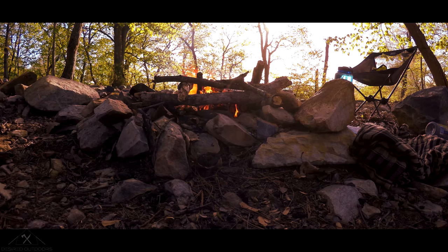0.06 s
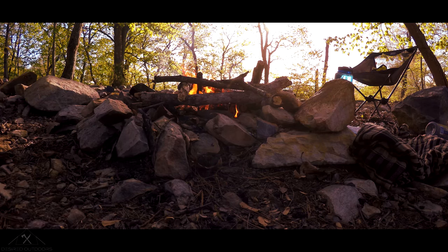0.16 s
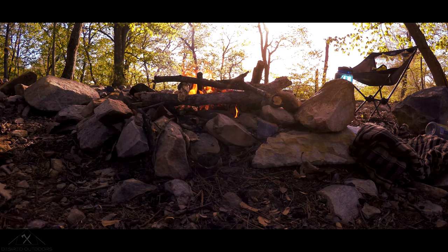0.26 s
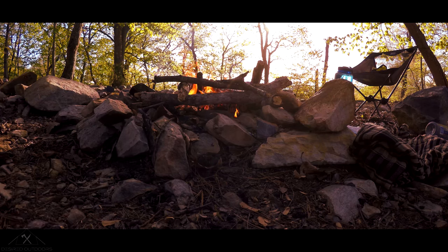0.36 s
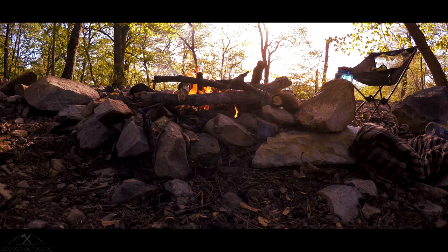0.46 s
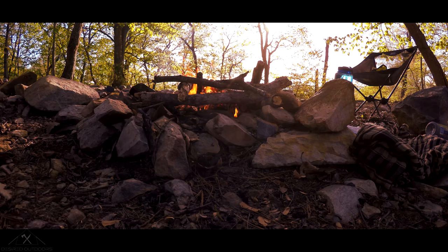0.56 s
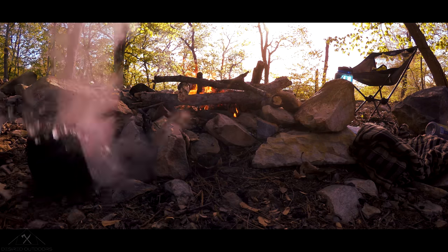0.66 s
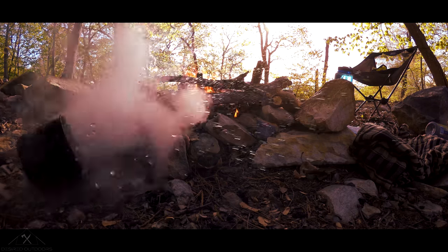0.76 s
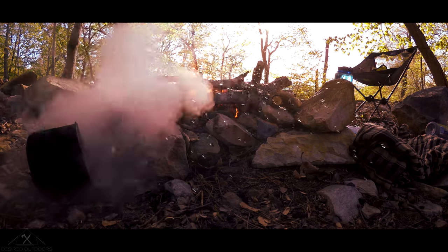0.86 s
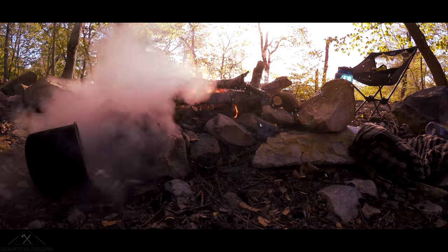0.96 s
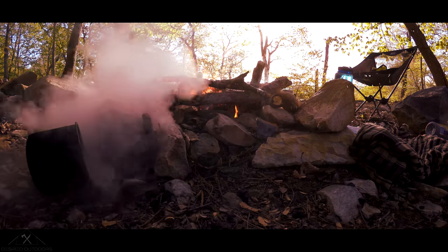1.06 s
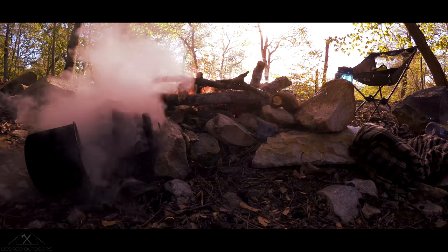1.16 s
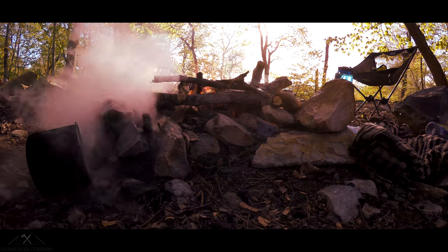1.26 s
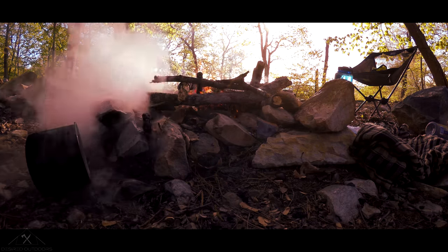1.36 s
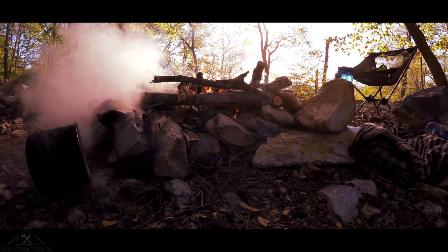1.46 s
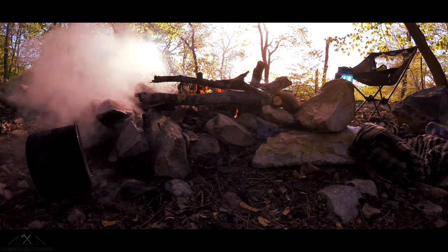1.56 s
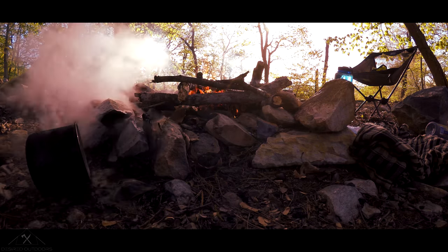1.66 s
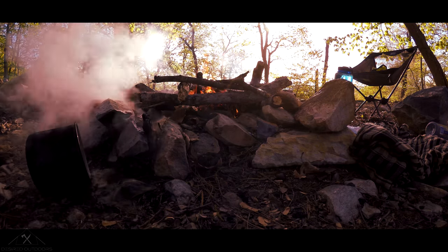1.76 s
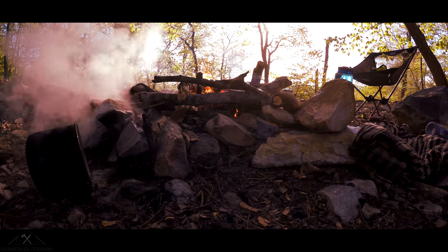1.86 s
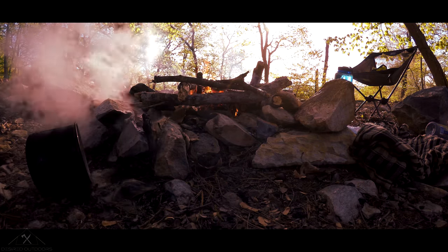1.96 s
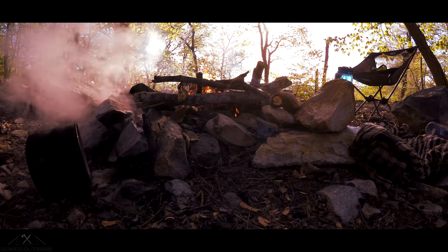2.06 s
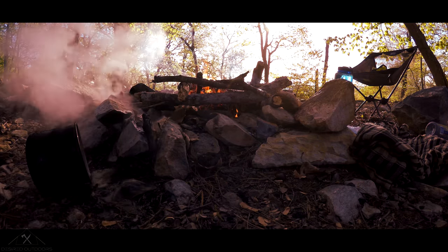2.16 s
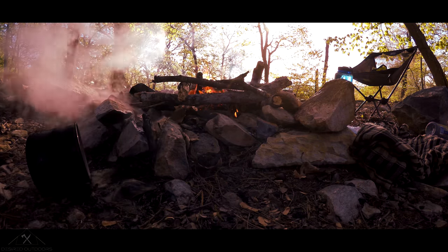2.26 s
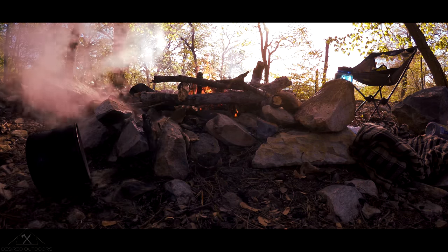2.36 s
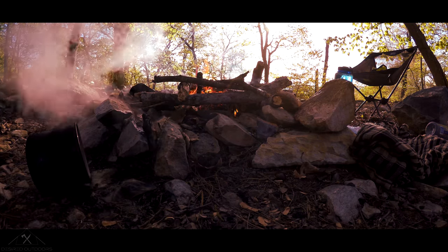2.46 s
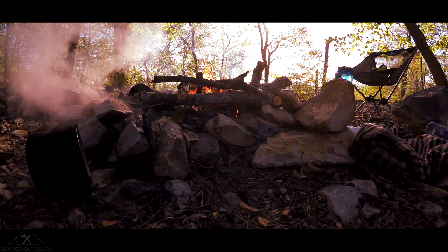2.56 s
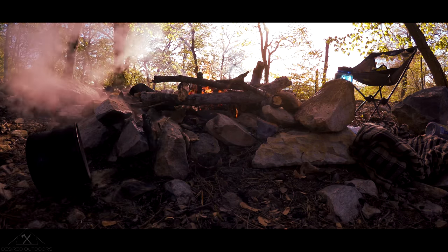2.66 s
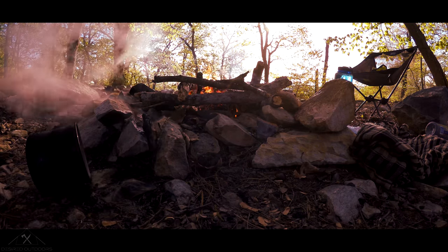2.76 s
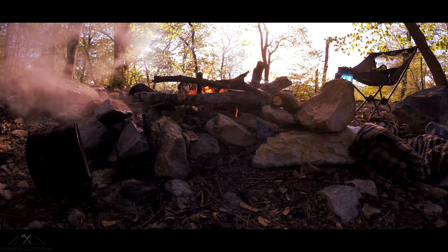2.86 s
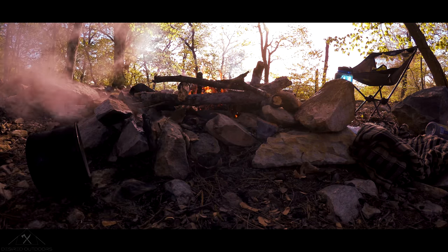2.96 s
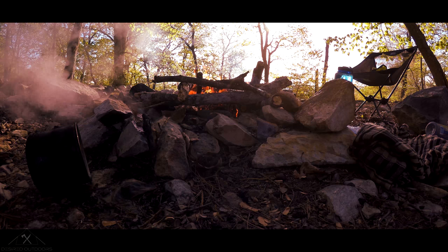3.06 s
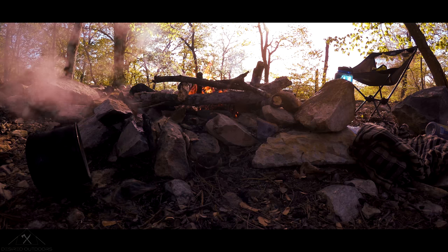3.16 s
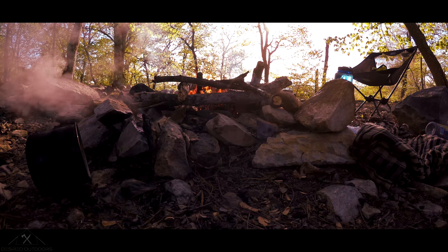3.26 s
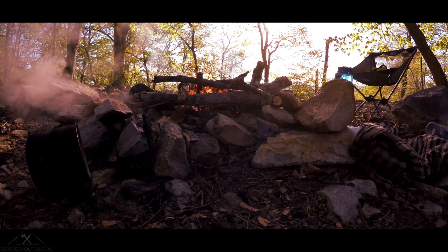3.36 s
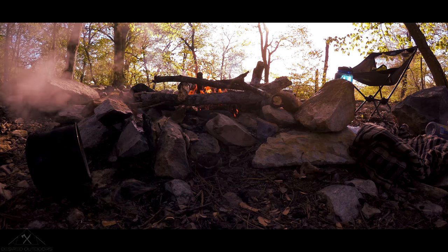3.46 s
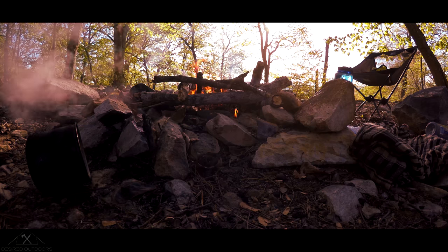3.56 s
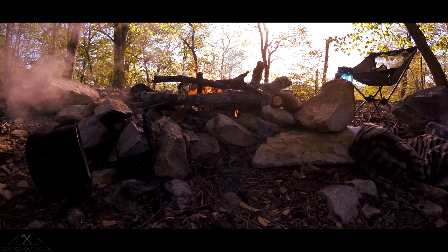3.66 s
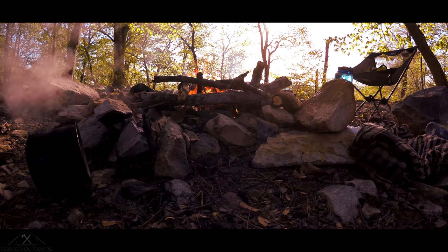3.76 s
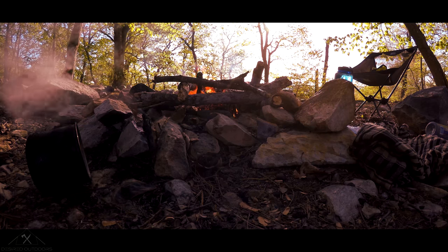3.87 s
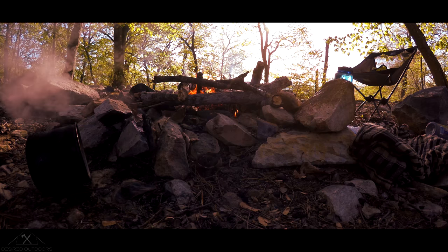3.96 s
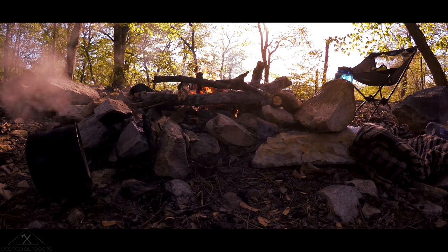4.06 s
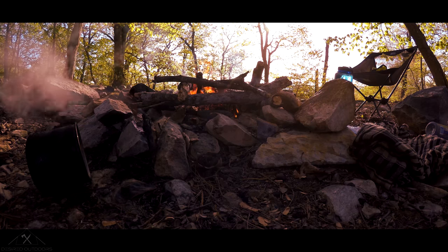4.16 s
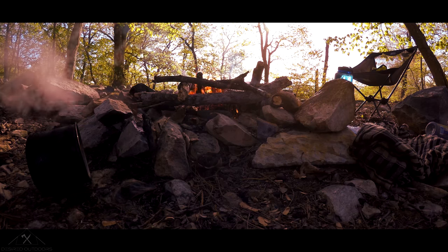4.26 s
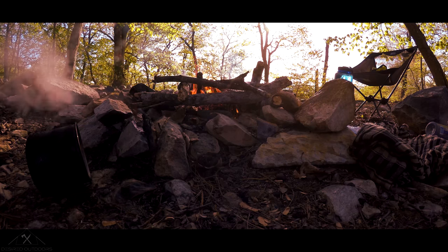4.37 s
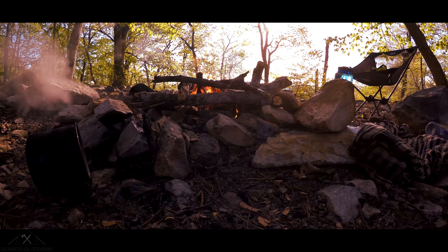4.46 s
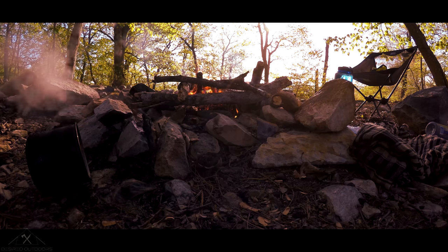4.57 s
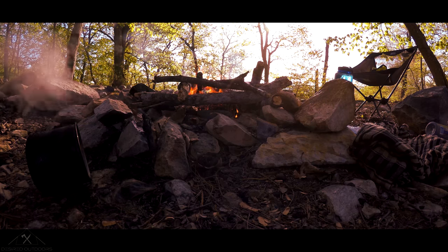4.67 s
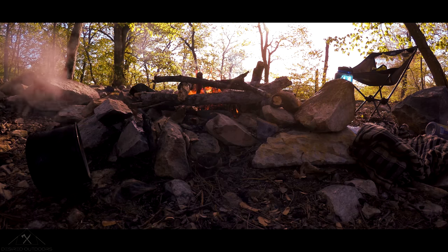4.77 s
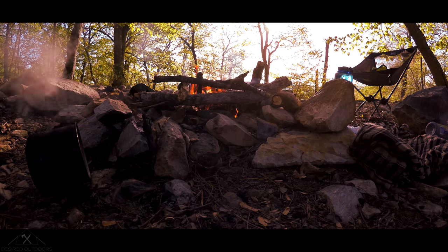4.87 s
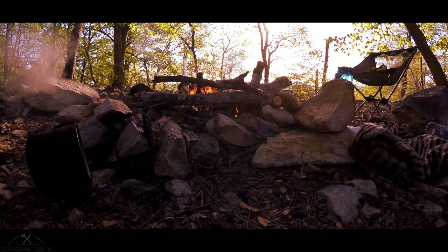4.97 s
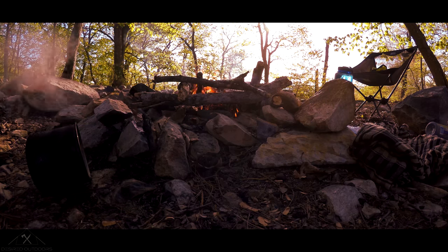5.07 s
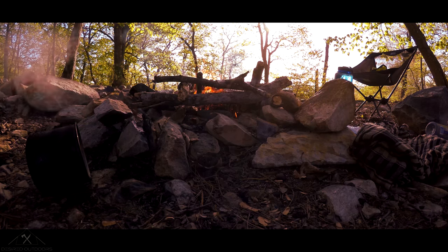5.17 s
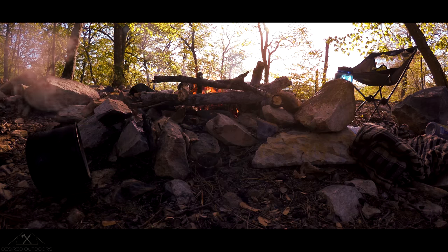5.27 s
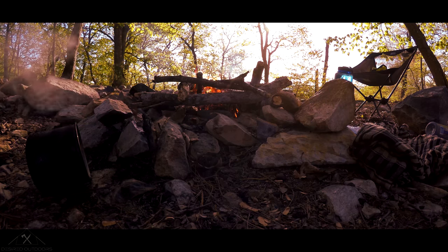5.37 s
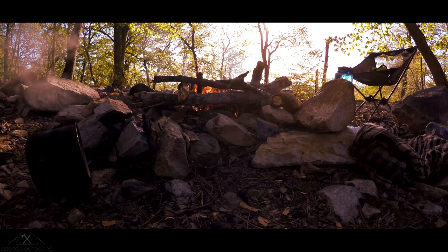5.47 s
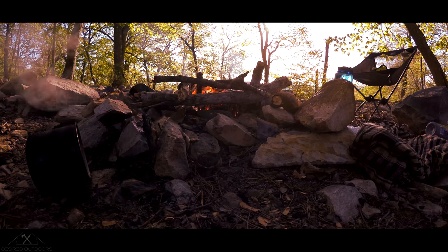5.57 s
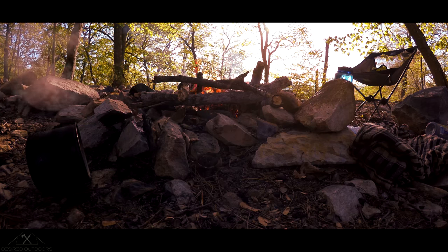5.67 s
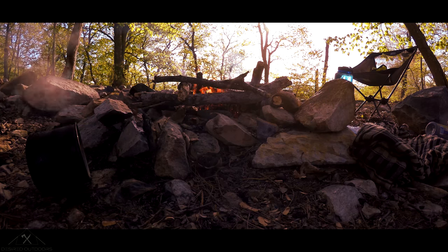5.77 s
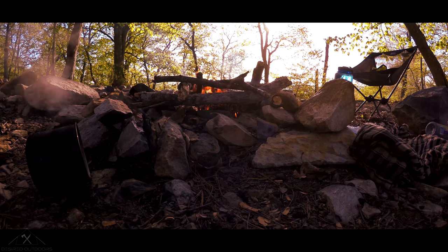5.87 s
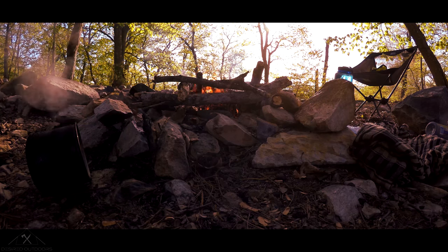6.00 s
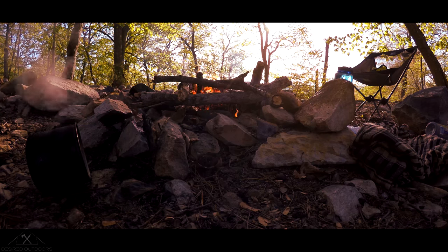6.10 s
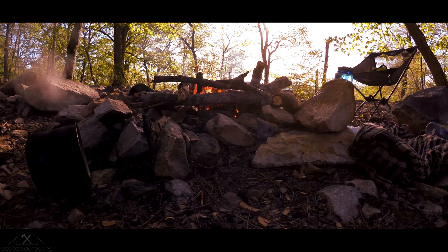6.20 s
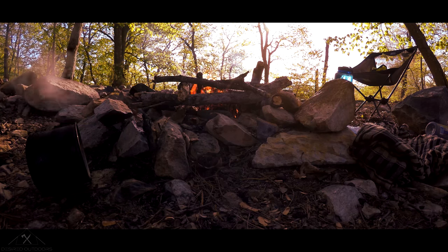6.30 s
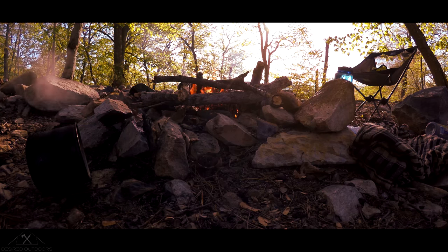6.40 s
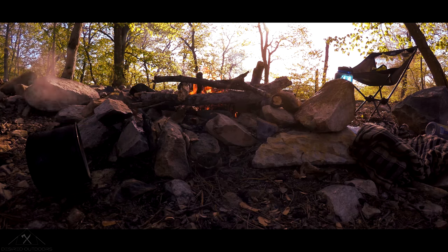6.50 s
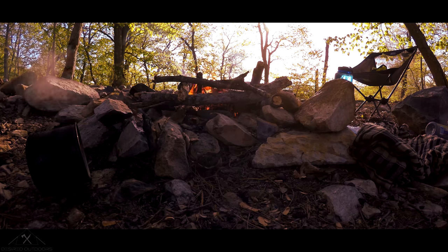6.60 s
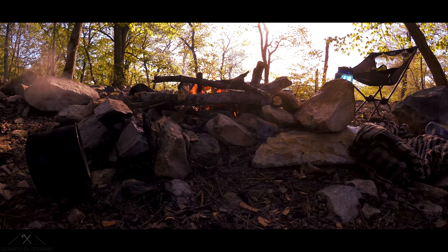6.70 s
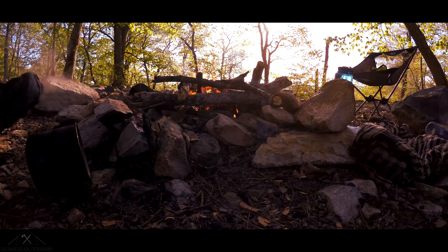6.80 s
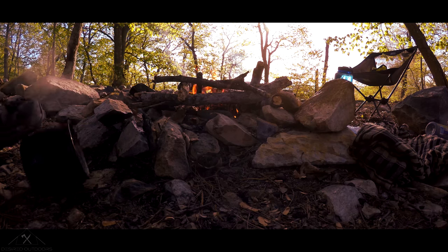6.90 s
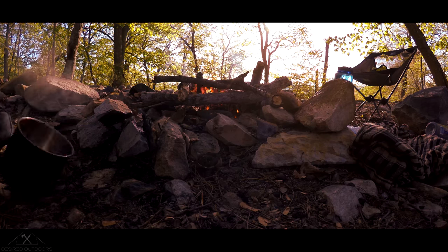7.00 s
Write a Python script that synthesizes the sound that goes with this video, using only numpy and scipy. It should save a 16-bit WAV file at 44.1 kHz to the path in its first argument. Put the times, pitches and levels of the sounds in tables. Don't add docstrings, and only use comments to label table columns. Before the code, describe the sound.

Water gurgles from a pot and bursts into hissing steam on hot campfire stones, the pot bangs down hard, then rocks on grit amid snaps.

```python
import sys
import numpy as np
from scipy import signal
from scipy.fft import rfft, irfft
from scipy.io import wavfile

SR = 44100
rng = np.random.default_rng(int(sys.argv[2]) if len(sys.argv) > 2 else 0)


def magnitude_from_level(level_db):
    exponent = np.asarray(level_db, float) / 20
    return 10 ** exponent


def output_pcm(signal):
    pcm = np.clip(np.atleast_2d(signal).T, -1, 1) * 32767
    wavfile.write(sys.argv[1], SR, np.round(pcm).astype(np.int16))


N = 310464
TIME = np.arange(N) / SR

# time in seconds, level in dB.
STEAM_PHASES = [
    [(0.0, -63), (0.136, -64.5), (0.2, -58.5), (0.32, -52.5)],
    [(0.33, -48), (0.442, -33.5), (0.474, -33.5), (0.504, -36), (0.6, -34.5), (0.684, -33), (0.7, -38)],
    [(0.73, -31.5), (0.76, -36), (0.854, -41.5), (0.884, -43.5), (0.905, -42.5)],
    [(0.915, -52), (0.97, -42), (0.994, -42.5), (1.118, -40), (1.216, -38.5), (1.25, -43), (1.395, -49)],
]
# slosh in the hollow, spatter, top sizzle, all in dB re steam.
STEAM_COMPANIONS = [
    (-2, -8.5, -11),
    (-5.5, -9.5, -8.5),
    (-1.5, -17.5, -3),
    (-4, -7.5, -4),
]
# frequency in Hz, density in dB per Hz.
STEAM_SPECTRUM = [(1350, -34), (2300, -7), (2870, 0), (3200, -4), (3840, -2.5), (4690, -4), (5930, -2),
                  (9000, -11), (11700, -36.5), (19800, -120)]
# frequency in Hz, density in dB per Hz.
SIZZLE_SPECTRUM = [(4710, -30), (8000, -7.5), (8660, -4), (12800, -5), (15400, -9)]
# time in seconds, level in dB.
RIM_GURGLE = [(0.0, -84), (0.068, -56.5), (0.134, -75), (0.192, -57.5), (0.312, -54.5), (0.42, -61)]
# frequency in Hz, width in Hz, level in dB re steam.
TRICKLE_RESONANCES = [(2800, 300, -10), (5800, 450, -8), (7500, 800, -9)]
GUSH_WASH_DB = -14.5
# centre in seconds, length in seconds, pitch in Hz, level in dB.
STEAM_JETS = [(.845, 0.034, 3200, -40.5), (.828, .015, 6500, -40), (0.63, 0.017, 7500, -38),
              (.815, .012, 8000, -44), (.945, 0.015, 9000, -49), (0.82, 0.032, 9700, -39),
              (1.2, .03, 4050, -45), (1.1, .02, 3400, -45), (0.98, 0.033, 2000, -40.5),
              (0.9, .03, 3000, -43), (.471, .012, 13000, -32.5), (.471, .012, 5700, -30),
              (0.38, .01, 9300, -41), (.6, .03, 3900, -38.5), (.665, .04, 5800, -36.5),
              (1.591, .011, 7500, -37), (1.576, 0.0091, 5900, -43), (1.42, 0.023, 6900, -41),
              (2.068, 0.028, 8400, -42.5), (2.066, 0.022, 4800, -49), (1.48, 0.052, 2800, -46),
              (2.345, 0.016, 6000, -41), (2.617, 0.011, 5700, -58.5), (2.44, 0.037, 4250, -45),
              (3.73, .05, 4100, -60)]
JET_EDGE_RATIO = 1.09

HOLLOW_HZ, HOLLOW_WIDTH_HZ = 740, 540

CONTACT_S = [
    .7110,
    .7162,
    .7192,
    .7408,
]
# crack in dB, crack t60 in seconds, hollow ring in dB, thud in dB.
CONTACTS = [
    (-6, 0.018, -15.5, -20.5),
    (-4, 0.012, 1, -9.5),
    (-13.5, 0.037, -17.5, -20),
    (-16.5, .005, -32.5, -37.5),
]
# frequency in Hz, level in dB, t60 in seconds.
BODY_MODES = [(263.7, 1.5, 0.014), (437, -6.5, 0.021), (516, -11.5, 0.042), (657, -9.5, 0.05),
              (766, -7, 0.034), (799, -12.5, 0.1), (924, -5, 0.028), (2000, -2, 0.014), (2500, 1.5, 0.0085)]
# frequency in Hz, level in dB, t60 in seconds.
THIN_WALL_MODES = [(4750, -22.5, .03), (5044, -22.5, 0.029), (5820, -22, .04), (6300, -21.5, 0.032),
                   (6695, -22.5, 0.039), (8800, -24, 0.018), (9300, -25, .05), (12200, -24, 0.017)]
# frequency in Hz, density in dB per Hz.
CRACK_SPECTRUM = [(710, -47), (1200, -20.5), (1650, -13.5), (2330, -7.5), (3300, -14), (4860, -1),
                  (6480, -3), (15400, -12)]

# start in seconds, contact in seconds, grind in dB, sag in the middle in dB.
ROCKING_SWINGS = [
    (1.381, 0.22, -34, 3.5),
    (1.818, .255, -38, 2.0),
    (2.255, .265, -44, -3),
    (2.704, 0.23, -46.5, -3),
    (3.155, 0.2, -47.5, -1),
    (3.618, .17, -53.5, -5),
    (6.932, 0.17, -52, 3),
]
FIRST_SWING_S = ROCKING_SWINGS[0][0]
LIFT_S = 6.9
SWELL_DB_PER_S, RISE_DB_PER_S, FALL_DB_PER_S = 8.5, 701, 127
FALL_STEEPENS_PER_S = 0.97
HOLLOW_DB, SPATTER_DB, DRYING_DB_PER_S = -10, -15, 5
SEETHE_DB, SEETHE_FALL_DB_PER_S = -49, 9
# frequency in Hz, width in Hz, level in dB.
WALL_RESONANCES = [(2480, 88, -11.5), (2930, 61, -19), (3850, 100, -18), (4210, 90, -14), (5690, 200, -9.5),
                   (6430, 400, -6.5), (7030, 110, -10), (7660, 320, -4), (8780, 350, -2), (9400, 410, -6.5),
                   (10660, 330, -18), (11870, 370, -12), (13100, 400, -10)]
# time in seconds, level in dB.
WALL_CLARITY = [(1.4, -11), (2.2, -3), (2.8, 2), (7.04, 6)]
# frequency in Hz, density in dB per Hz.
GRIND_SPECTRUM = [(1000, -4), (1300, 2), (2100, -16), (2480, 0.5), (4990, 0.5), (6460, -2.5),
                  (12800, -10.5), (15400, -11.5)]
# frequency in Hz, density in dB per Hz.
SEETHE_SPECTRUM = [(900, -9), (1800, -2.5), (4000, -1), (9000, -1), (15400, -8.5)]

# time in seconds, peak in dB, pitch in Hz, t60 in seconds.
STONE_KNOCKS = [(.546, -18, 686, 0.0078), (.581, -18.5, 700, 0.0077), (.615, -24.5, 855, 0.015),
                (.643, -31.5, 1010, 0.022), (.663, -28, 1060, 0.024), (.915, -40.5, 750, 0.023),
                (.96, -37, 800, 0.033), (1.15, -40, 300, 0.087), (1.191, -40, 180, .09),
                (1.618, -36, 800, .01), (1.891, -39, 750, .008), (2.034, -39, 790, .012),
                (2.487, -34, 804, 0.011), (2.865, -41, 800, .01), (3.331, -43, 750, .014),
                (3.543, -51.5, 520, .015), (3.852, -51, 1494, 0.009), (3.918, -48.5, 1037, 0.011),
                (5.187, -54, 1202, 0.022), (5.96, -47, 1800, 0.012), (6.208, -47, 1290, 0.016),
                (6.2312, -46.5, 710, 0.026), (6.236, -53, 1107, 0.02), (6.241, -55, 1000, 0.023),
                (6.245, -52.5, 1110, 0.016), (6.29, -54.5, 890, 0.017), (6.331, -45, 550, 0.025),
                (6.53, -50, 1010, 0.013), (6.261, -51, 700, 0.02), (6.7349, -26.5, 815, 0.034),
                (6.7349, -22.5, 1230, 0.017), (6.941, -41, 880, 0.1), (6.944, -34.5, 210, 0.068),
                (6.999, -47.5, 946, 0.095), (6.891, -49.5, 1400, 0.012), (.462, -28, 870, 0.096)]
# time in seconds, level in dB.
WIRE_TAPS = [(6.9415, -46), (6.951, -48), (6.9575, -47), (6.976, -50), (6.988, -48), (7.006, -49),
             (7.018, -50), (7.03, -52)]
# frequency in Hz, level in dB, t60 in seconds.
WIRE_MODES = [(2590, -4, .06), (3730, -6, .05), (4420, -1, .06), (5500, -3, .05), (5730, -2, .05),
              (6750, 0, .06), (7200, 0, .05), (8160, 0, .07), (9100, -2, .04), (9990, 0, .06),
              (10250, -2, .05), (11500, -3, .04)]

# time in seconds, peak in dB, pitch in Hz, broad part in dB re peak.
DROP_BURSTS = [(0.0335, -50, 13000, -15), (0.0508, -41, 12400, -5.5), (0.145, -56, 12000, -3),
               (0.3386, -33, 5550, -6), (0.399, -25, 3340, -6.5), (0.4264, -22, 5750, -13),
               (0.4674, -19, 13100, -1.5), (0.4725, -21, 9000, -1), (0.8256, -26, 6400, -4.5),
               (0.8635, -30, 6500, -5.5), (0.9384, -38, 3100, -6), (1.0531, -28, 4000, -5.5),
               (0.4894, -28, 5940, -2), (0.9035, -17, 4070, -10), (0.9848, -27, 2300, 0),
               (0.9853, -26.5, 7200, -7.5), (1.2183, -24, 5200, -4), (1.4125, -21.5, 4330, -4),
               (1.4222, -18.5, 4400, -4), (1.4416, -23.5, 2500, -4), (1.5719, -25, 5950, -5),
               (1.5889, -26, 7480, -5), (1.605, -39, 5500, -9), (1.6125, -21, 1990, -6),
               (1.618, -25, 5000, -3), (1.626, -26, 10500, -2.5), (1.6345, -27, 9400, 4),
               (1.643, -29, 6500, -3), (1.7087, -31.5, 5870, -1.5), (1.72, -32, 8500, -3),
               (1.745, -34, 6000, -4), (1.789, -32, 4770, -1), (1.8714, -22.5, 4870, -3.5),
               (1.8922, -22, 4340, -2), (1.909, -28, 4500, -6), (1.918, -33, 1900, -3),
               (2.033, -25, 4300, -3), (2.053, -30, 5500, -4), (2.063, -29, 2500, -4.5)]
# time in seconds, peak in dB, pitch in Hz, broad part in dB re peak.
GRIT_SNAPS = [(2.282, -38.5, 7800, -9), (2.332, -35, 11000, -5), (2.345, -31, 6310, -1),
              (2.395, -32, 4500, -4), (2.4423, -23.5, 4220, 0), (2.457, -30, 9000, 1),
              (2.47, -25, 2980, -8), (2.487, -26, 7550, 2), (2.6134, -39.5, 5680, -4),
              (2.719, -44, 5500, -10), (2.7296, -41, 7550, -5), (2.872, -31, 6720, -4),
              (2.916, -23, 7560, -7), (2.922, -33.5, 13000, -3), (3.0584, -37.5, 13100, -12),
              (3.1704, -39, 7580, -11), (3.3305, -27, 8200, -5), (3.5424, -44, 7930, 2),
              (3.6463, -45, 4190, -5.5), (3.851, -44, 8290, -1), (3.8785, -41.5, 13000, -3),
              (3.9007, -26.5, 8370, -8.5), (3.9182, -28, 12900, -4), (6.7089, -46, 4690, -7.5),
              (6.7349, -18.5, 2190, -8.5), (6.8064, -32.5, 6600, -8.5), (6.8835, -53, 2500, 0),
              (6.9428, -28.5, 6800, -2)]
# time in seconds, peak in dB, pitch in Hz.
EMBER_POPS = [(4.2734, -46.5, 6660), (4.6111, -46.5, 4542), (4.8601, -47, 8220), (5.0805, -46, 13100),
              (5.2033, -29.5, 12530), (5.224, -43, 10800), (5.2697, -42, 7900), (5.3006, -48, 8650),
              (5.4482, -39, 6790), (5.4743, -46, 3130), (5.571, -49, 3755), (5.6148, -53.5, 3690),
              (5.6472, -42, 8240), (5.8617, -43, 7540), (5.9586, -52, 2390), (6.0278, -39, 7850),
              (6.0757, -46, 3410), (6.207, -45, 2020), (6.2401, -43, 6680), (6.2577, -43.5, 7200),
              (6.3107, -46, 12780), (6.3518, -40.5, 8250), (6.434, -41.5, 4100), (6.496, -48, 7910),
              (6.5122, -42, 6300), (6.5762, -43.5, 4750), (6.6405, -44, 7360)]
DROP_LOW_DB, GRIT_LOW_DB, EMBER_LOW_DB, EMBER_BROAD_DB = -9.5, -11, -14.5, -4.5
LOW_DB_PER_OCTAVE = -5
# time in seconds, level in dB.
EMBER_CRACKLE = [(0, -65), (4.9, -64), (5.3, -59), (7.04, -58)]

# (time in seconds, level in dB).
BIRD_NOTES = [((.014, 5200, 5700), [(0.02, -52.5), (0.121, -49), (.224, -50)]), ((0.025, 5800, 8500),
              [(0.056, -53), (0.16, -54), (0.258, -54)]), ((0.125, 5700, 6400), [(3.444, -72.5)]),
              ((0.21, 8500, 7650), [(3.428, -72)]), ((.16, 2800, 2760), [(3.93, -69)]), ((0.09, 2620, 2590),
              [(4.02, -73), (4.48, -71.5)]), ((.05, 2900, 3150), [(4.63, -73)]), ((.07, 2200, 4100),
              [(5.387, -68)]), ((0.07, 3950, 3300), [(5.56, -68)]), ((.1, 3250, 2500), [(5.61, -73)]),
              ((0.09, 1750, 2060), [(5.31, -75), (5.48, -75), (5.64, -72), (5.81, -72), (5.99, -71),
              (6.15, -69), (6.32, -73.5)]), ((0.09, 1760, 2050), [(6.46, -72), (6.63, -73)])]

# time in seconds, buffet in dB.
WIND_BUFFETS = [(0.0, -48), (0.1, -40), (0.25, -59.5), (0.61, -44), (0.8, -56.5), (1.02, -50),
                (1.35, -42.5), (1.72, -47), (2.06, -63.5), (2.86, -58), (3.39, -46), (4.08, -46.5),
                (4.82, -63), (5.3, -50.5), (5.57, -53.5), (6.15, -70.5), (6.75, -66.5), (7.04, -46.5)]
# frequency in Hz, density in dB per Hz.
RUMBLE_SPECTRUM = [(26, -32), (45, -7), (75, 2), (97, -14), (118, -4), (150, -8.5), (210, -8.5), (339, -11),
                   (900, -28.5), (1170, -57), (1980, -120)]
RUMBLE_DB, RUMBLE_RISE_DB_PER_S, RUMBLE_RISE_S = -58, 1.5, 4.3
# frequency in Hz, density in dB per Hz.
AIR_SPECTRUM = [(350, -30.5), (600, -1.5), (726, -6), (1090, -6), (2600, -5), (3800, -7.5), (8350, -7),
                (10400, -12), (13100, -8), (15400, -15)]
AIR_DB = -65.5
# time in seconds, level in dB.
ENGINE_HUM = [(1.8, -67), (3.26, -60.5), (4.13, -67), (4.37, -58.5), (6.44, -61), (7.04, -55.5)]
HUM_HZ, HUM_BEAT_HZ, HUM_BEAT_S = 70.5, 4.4, 5.74

INPUT_CUTOFF_HZ = 15650


def rms_one(x):
    return x / np.sqrt(np.mean(x ** 2) + 1e-20)


def level_curve(rows, hold_s=.011):
    s, db = np.transpose(list(rows) + [(rows[-1][0] + hold_s, rows[-1][1])])
    return np.interp(TIME, s, db, left=-120, right=-120)


def colour(x, spectrum):
    points = np.array(spectrum)
    hz = np.maximum(np.fft.rfftfreq(N, 1 / SR), 1)
    gain_db = np.interp(np.log(hz), np.log(points[:, 0]), points[:, 1])
    return rms_one(irfft(rfft(x) * magnitude_from_level(gain_db), N))


def band(x, low_hz, high_hz, order=2):
    edges_hz = [low_hz, min(high_hz, .45 * SR)]
    return signal.sosfilt(signal.butter(order, edges_hz, "band", fs=SR, output="sos"), x)


def resonance(x, hz, width_hz, order=2):
    return rms_one(band(x, hz - width_hz / 2, hz + width_hz / 2, order))


def drift(rate):
    r = np.exp(-80 * np.pi * rate / SR)
    slow = signal.lfilter([1], [1, -2 * r, r * r], rng.standard_normal(N // 40 + 2002))[2000:]
    return np.interp(np.arange(N) / 40, np.arange(len(slow)), rms_one(slow))


def ring(force, hz, t60):
    r, w = magnitude_from_level(-60 / (t60 * SR)), 2 * np.pi * hz / SR
    return signal.lfilter([0, np.sin(w)], [1, -2 * r * np.cos(w), r * r], force + 1e-18)


def burst(s, t60):
    age = TIME - s
    return (age >= 0) * magnitude_from_level(-60 * np.clip(age, 0, 1) / t60)


def sputter(per_s, spread_db, burst_s, flicker_db):
    kick_db = spread_db * np.minimum(rng.exponential(1, N), 4)
    kicks = (rng.random(N) < per_s / SR) * magnitude_from_level(kick_db)
    bursts = signal.lfilter([1], [1, -np.exp(-1 / (burst_s * SR))], kicks)
    return rms_one((1 + bursts) * magnitude_from_level(flicker_db * drift(21)) * rng.standard_normal(N))


def patchy(x, patch_db, rate):
    spectrum, octave = rfft(x), np.log2(np.maximum(np.fft.rfftfreq(N, 1 / SR), 1))
    centres = np.log2(1500) + np.arange(14) / 4
    out = np.zeros(N)
    for row in np.eye(len(centres)):
        share = np.interp(octave, centres, row)
        out += magnitude_from_level(patch_db * drift(rate)) * irfft(spectrum * share, N)
    return rms_one(out)


def wet_hiss(layers, bright, source):
    in_hollow = band(source, HOLLOW_HZ - HOLLOW_WIDTH_HZ / 2, HOLLOW_HZ + HOLLOW_WIDTH_HZ / 2, order=1)
    slosh = rms_one(band(in_hollow, 380, 1180))
    spatter = rms_one(band(np.roll(source, SR // 200), 1300, 2300))
    parts = [slosh, spatter, colour(source, SIZZLE_SPECTRUM)]
    out = np.zeros(N)
    for gain, mix_db in layers:
        out += gain * (bright + sum(magnitude_from_level(db) * part for db, part in zip(mix_db, parts)))
    return out


def splash():
    steam = [magnitude_from_level(level_curve(phase)) for phase in STEAM_PHASES]
    gurgle = magnitude_from_level(level_curve(RIM_GURGLE)) * rms_one(band(rng.standard_normal(N), 1080, 1400))
    source = patchy(sputter(90, spread_db=1.5, burst_s=.0015, flicker_db=.5), patch_db=1.7, rate=16)
    wash = magnitude_from_level(GUSH_WASH_DB) * sum(steam) * rms_one(band(source, 110, 340))
    wall = sum(magnitude_from_level(db) * resonance(source, hz, width_hz) for hz, width_hz, db in TRICKLE_RESONANCES)
    hiss = wet_hiss(zip(steam, STEAM_COMPANIONS), colour(source, STEAM_SPECTRUM), source)
    return gurgle + steam[0] * wall + wash + hiss


def steam_jets():
    out, jets = np.zeros(N), rng.standard_normal((len(STEAM_JETS), 4000))
    age = TIME[:4000] - TIME[2000]
    for (s, length, hz, db), jet in zip(STEAM_JETS, jets):
        swell = np.exp(-.5 * (age / (.4 * length)) ** 2)
        hiss = rms_one(band(jet, hz / JET_EDGE_RATIO, hz * JET_EDGE_RATIO))
        out[round(s * SR) - 2000:][:4000] += magnitude_from_level(db) * swell * hiss
    return out


def bang():
    out, crack = np.zeros(N), colour(rng.standard_normal(N), CRACK_SPECTRUM)
    thud = rms_one(band(rng.standard_normal(N), 230, 630))
    for s, (crack_db, t60, hollow_db, thud_db) in zip(CONTACT_S, CONTACTS):
        click = np.zeros(N)
        click[round(s * SR)] = magnitude_from_level(hollow_db)
        out += magnitude_from_level(crack_db) * burst(s, t60) * crack
        out += magnitude_from_level(thud_db - 4.5) * burst(s, 0.012) * thud
        out -= magnitude_from_level(thud_db - 5.5) * band(burst(s, 0.012), 11, 70, order=1)
        shake = burst(s, 0.27 * t60) * crack
        for hz, db, ring_s in THIN_WALL_MODES:
            out += magnitude_from_level(crack_db + db) * ring(shake, hz, ring_s)
        for hz, db, ring_s in BODY_MODES:
            out += magnitude_from_level(db) * rng.choice([-1, 1]) * ring(click, hz, ring_s)
    return out


def swing_gain():
    out = np.zeros(N)
    for s, length, db, sag_db in ROCKING_SWINGS:
        age = TIME - s
        share = np.clip(age / length, 0, 1)
        swell_db = SWELL_DB_PER_S * length * share * (s < LIFT_S)
        hold_db = swell_db - sag_db * np.sin(np.pi * share)
        rise_db = np.minimum(RISE_DB_PER_S * age - 22, 0)
        fall_rate = FALL_DB_PER_S * (1 + FALL_STEEPENS_PER_S * (s - FIRST_SWING_S))
        out += magnitude_from_level(db + hold_db + rise_db - fall_rate * np.maximum(age - length, 0))
    return out


def rocking():
    source = sputter(120, spread_db=-7.5, burst_s=0.0024, flicker_db=0.9)
    wall = np.zeros(N)
    for hz, width_hz, db in WALL_RESONANCES:
        wall += magnitude_from_level(db + 2.5 * drift(7)) * resonance(source, hz, width_hz, order=1)
    grind = rms_one(magnitude_from_level(5.0) * colour(source, GRIND_SPECTRUM) + magnitude_from_level(level_curve(WALL_CLARITY)) * wall)
    since, rolling = TIME - FIRST_SWING_S, swing_gain()
    spatter_db = np.maximum(SPATTER_DB - DRYING_DB_PER_S * since, -30)
    seethe_gain = (since > 0) * magnitude_from_level(SEETHE_DB - SEETHE_FALL_DB_PER_S * since)
    seethe = seethe_gain * colour(np.roll(source, SR), SEETHE_SPECTRUM)
    slop = rolling * magnitude_from_level(spatter_db - 9.5) * rms_one(band(source, 196, 520))
    return seethe + slop + wet_hiss([(rolling, (HOLLOW_DB, spatter_db))], grind, source)


def knocks():
    out, rattles = np.zeros(N), rng.standard_normal((len(STONE_KNOCKS), 4000))
    for (s, peak_db, hz, t60), rattle in zip(STONE_KNOCKS, rattles):
        clack = 2.5 * band(rattle * magnitude_from_level(-60 * TIME[:4000] / t60), hz / 2.2, hz * 1.8)
        hollow = 0.87 * band(ring(np.eye(1, 4000)[0], hz, t60), hz / 1.8, hz * 1.5, order=1)
        start = round(s * SR)
        out[start:][:4000] += magnitude_from_level(peak_db) * (clack + hollow)[:N - start]
    return out


def handle():
    s, tap_db = np.transpose(WIRE_TAPS)
    out, uneven_db = np.zeros(N), rng.normal(0, 6.0, (len(s), len(WIRE_MODES)))
    for (hz, db, t60), own_db in zip(WIRE_MODES, uneven_db.T):
        clicks = np.zeros(N)
        clicks[(s * SR).astype(int)] = magnitude_from_level(tap_db + db - 9 + own_db)
        out += ring(clicks, hz, t60)
    return out


def pops():
    rows = [(*row, DROP_LOW_DB) for row in DROP_BURSTS]
    rows += [(*row, GRIT_LOW_DB) for row in GRIT_SNAPS]
    rows += [(*row, EMBER_BROAD_DB, EMBER_LOW_DB) for row in EMBER_POPS]
    out, tails = np.zeros(N), rng.standard_normal((len(rows), 1200))
    for (s, peak_db, hz, broad_db, low_db), tail in zip(rows, tails):
        snap = .8 * tail * magnitude_from_level(-60 * TIME[:1200] / 0.012)
        snap[0] = 2.2
        core = band(snap, hz / 1.104, hz * 1.2) * np.sqrt(9000 / hz)
        broad = magnitude_from_level(broad_db) * band(snap, 1500, 17000, order=1)
        low = magnitude_from_level(low_db + LOW_DB_PER_OCTAVE * np.log2(hz / 5000) + 7.5) * band(snap, 250, 1300)
        start = round(s * SR)
        out[start:][:1200] += magnitude_from_level(peak_db) * (core + broad + low)[:N - start]
    return out


def embers():
    ticks = (rng.random(N) < 28 / SR) * magnitude_from_level(1.8 * np.minimum(rng.exponential(1, N), 3))
    dealt = rng.integers(0, 6, N)
    out = np.zeros(N)
    for k, hz in enumerate(np.geomspace(4500, 13500, 6)):
        puffs = signal.lfilter([1], [1, -magnitude_from_level(-60 / (.008 * SR))], ticks * (dealt == k) + 1e-18)
        out += band(puffs * rng.standard_normal(N), hz, hz * 1.2, order=1)
    return magnitude_from_level(level_curve(EMBER_CRACKLE) + 10.5) * out


def birds():
    out = np.zeros(N)
    for (length, start_hz, end_hz), songs in BIRD_NOTES:
        size = round(length * SR)
        phase = 2 * np.pi * np.cumsum(np.linspace(start_hz, end_hz, size)) / SR
        for s, db in songs:
            waver = np.cumsum(rng.normal(0, 0.06, size))
            out[round(s * SR):][:size] += magnitude_from_level(db + 0.5) * np.hanning(size) ** .5 * np.sin(phase + waver)
    trunks = rng.standard_normal(SR // 4) * magnitude_from_level(-60 * TIME[:SR // 4] / 0.8)
    return out + magnitude_from_level(-35) * signal.fftconvolve(out, trunks)[:N]


def woods():
    buffet = rms_one(band(rng.standard_normal(N), 1.7, 16, order=3)) * magnitude_from_level(level_curve(WIND_BUFFETS) + 4.5)
    nearer_db = RUMBLE_DB + RUMBLE_RISE_DB_PER_S * np.maximum(TIME - RUMBLE_RISE_S, 0)
    rumble = colour(rng.standard_normal(N), RUMBLE_SPECTRUM) * magnitude_from_level(nearer_db + 0.48 * drift(8))
    air = colour(rng.standard_normal(N), AIR_SPECTRUM) * magnitude_from_level(AIR_DB)
    beat = 1 + 1.2 * np.cos(2 * np.pi * HUM_BEAT_HZ * (TIME - HUM_BEAT_S))
    hum = magnitude_from_level(level_curve(ENGINE_HUM)) * beat * np.sin(2 * np.pi * HUM_HZ * TIME)
    return buffet + rumble + air + hum


def scene():
    water = splash() + steam_jets()
    pot = bang() + rocking() + knocks() + handle()
    fire = pops() + embers()
    return (water + pot + fire + birds() + woods())[None]


def roll_off(x):
    return signal.sosfilt(signal.butter(12, 15520, fs=SR, output="sos"), x)


def record(dry):
    clipped = np.clip(dry, -.98, .98)
    low_pass = signal.cheby2(12, 30, INPUT_CUTOFF_HZ, fs=SR, output="sos")
    mix = signal.sosfilt(low_pass, clipped)
    return roll_off(mix)


dry = scene()
out = record(dry)
output_pcm(out)
```